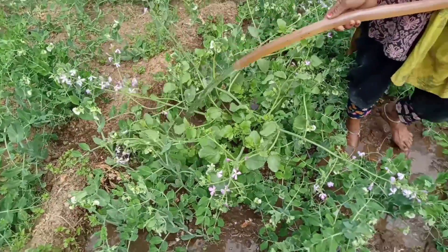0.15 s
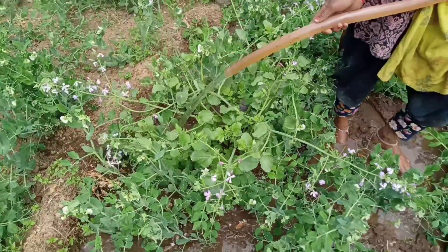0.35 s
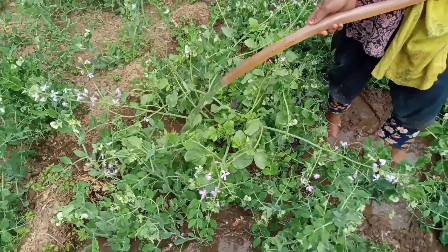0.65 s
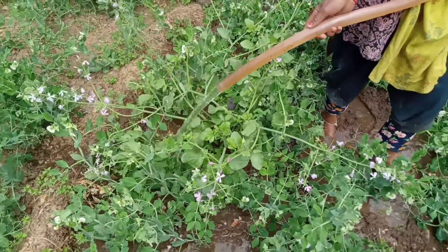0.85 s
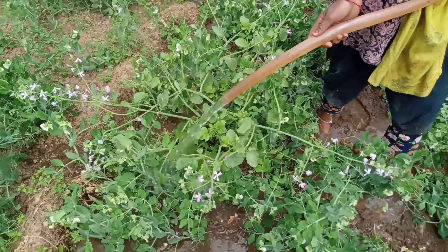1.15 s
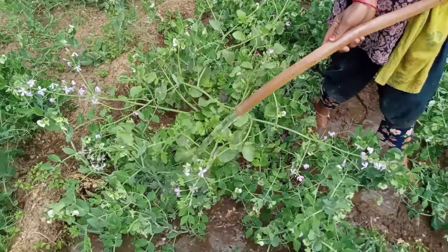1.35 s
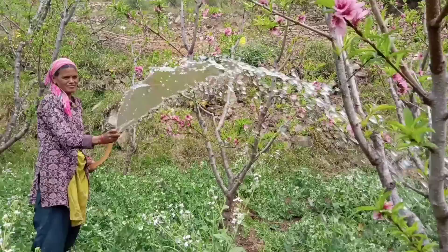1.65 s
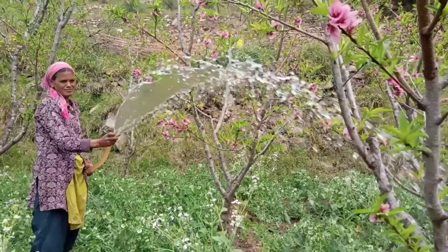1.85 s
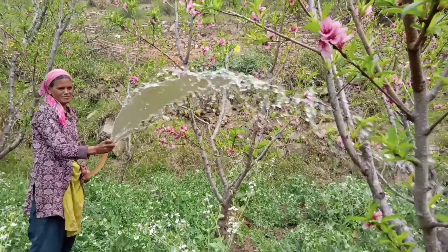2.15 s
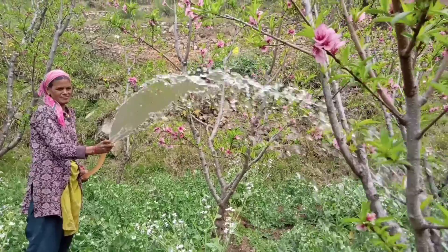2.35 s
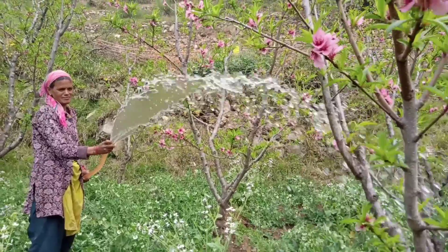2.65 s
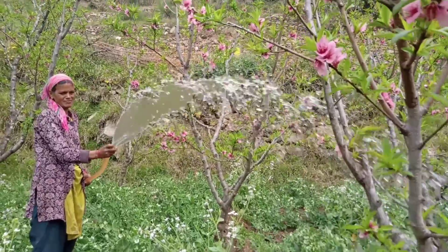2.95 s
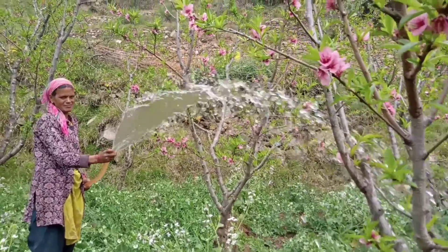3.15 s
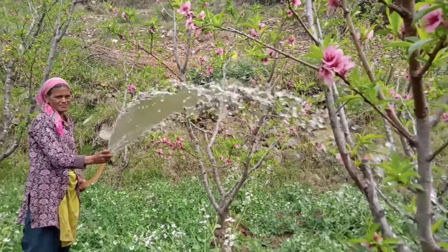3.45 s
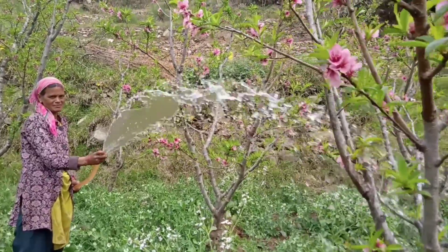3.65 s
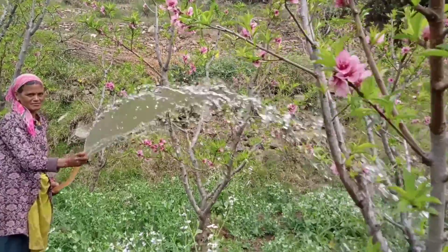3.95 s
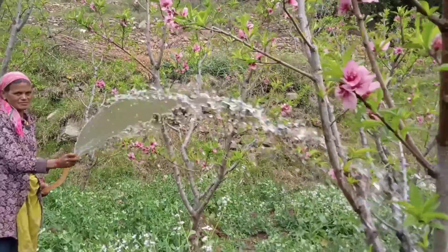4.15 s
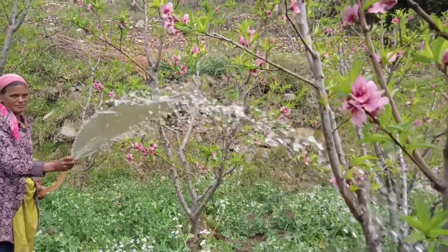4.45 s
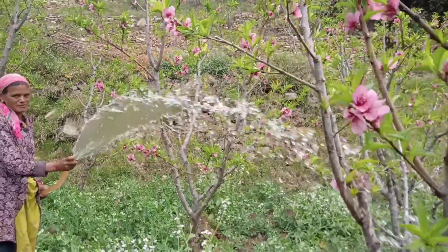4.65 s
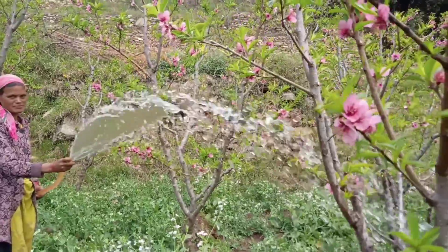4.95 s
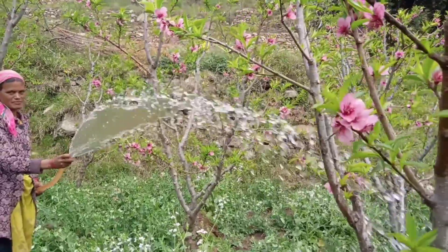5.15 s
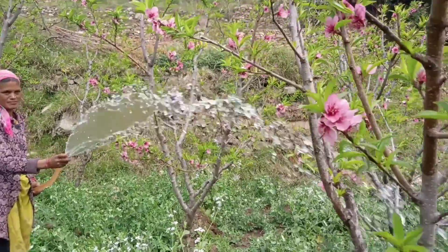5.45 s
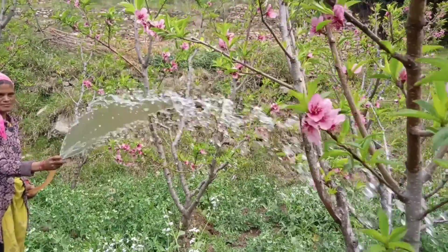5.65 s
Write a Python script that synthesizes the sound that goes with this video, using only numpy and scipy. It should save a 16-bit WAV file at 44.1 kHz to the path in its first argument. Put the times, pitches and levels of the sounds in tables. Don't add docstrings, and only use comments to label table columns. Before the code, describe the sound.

An open field heard through one small microphone, the same on both channels, dry and bright, with very faint low rumble. From 0 to 1.6 s a hose stream pours close by through leaves into mud: a steady fine hiss with wet plops and droplet ticks. Around 0.25-0.45 s it turns toward the puddle and the leafy hiss thins; from about 0.55 s it returns through leaves, with a narrow high singing edge from the hollow it digs. A thin far-off whistle wavers faintly at 0.75-1.15 s. At 1.6 s the sound cuts to silence for a tenth of a second. From 1.7 s a wide fan of water fades in over about 0.2 s, a brighter sizzling spray landing in ragged clumps and brief gaps, with leaf slaps, crisp ticks and bubbling pockets. It grows heavy near 4 s, thins around 4.5 s, and is fullest from 5.15 s to the end at about 5.8 s.

```python
import sys
import numpy as np
from scipy import signal
from scipy.fft import rfft, irfft
from scipy.io import wavfile
from scipy.ndimage import uniform_filter1d, map_coordinates

SR = 44100
rng = np.random.default_rng(int(sys.argv[2]) if len(sys.argv) > 2 else 0)


def dump(signal):
    limited = np.clip(np.atleast_2d(signal).T, -1, 1)
    pcm = np.round(limited * 32767).astype(np.int16)
    wavfile.write(sys.argv[1], SR, pcm)


def volts_from_db(level):
    exponent = np.asarray(level, float) / 20
    return 10 ** exponent


N = 255339
# start in seconds, end in seconds.
CUT = (1.6056, 1.702)
FADE_S, FADE_FROM, FADE_BEND = 0.22, 0.16, 1.25


def unit(x):
    return x / np.sqrt(np.mean(x ** 2) + 1e-20)


def along(points, hz):
    f, db = np.transpose(points[1:])
    return np.interp(np.log(hz + 1), np.log(f + 1), db)


def curves(rows):
    s, *columns = np.transpose(rows)
    return [np.interp(np.arange(N) / SR, s, column) for column in columns]


def wobble(rate):
    knots = rng.standard_normal(int(N * rate / SR) + 4)
    return map_coordinates(knots, [np.arange(N) * rate / SR])


def coloured(x, points, lo, hi):
    hz = np.fft.rfftfreq(8192, 1 / SR)
    edges = 1 / np.sqrt((1 + (lo / (hz + 1)) ** 24) * (1 + (hz / hi) ** 24))
    cepstrum = irfft(np.log(volts_from_db(along(points, hz)) * edges + 1e-6))
    causal = np.r_[cepstrum[0], 2 * cepstrum[1:4096], np.zeros(4096)]
    response = irfft(np.exp(rfft(causal)))[:4096]
    return signal.fftconvolve(x, response)[:N]


def patchy(depth_db):
    z = signal.stft(rng.standard_normal(N), nperseg=256)[2]
    field = uniform_filter1d(rng.standard_normal(z.shape), size=4, axis=0)
    field = uniform_filter1d(field, size=4, axis=1)
    hiss = signal.istft(z * volts_from_db(depth_db * unit(field)), nperseg=256)[1]
    return unit(hiss[:N])


def rings(s, gain, hz, t60, size):
    t = np.arange(size) / SR
    decay = t / t60[:, None]
    turns = hz[:, None] * t
    onset = 1 - np.exp(-1.6 * turns)
    bend = 1 + 0.046 * np.minimum(decay, 1)
    wave = gain[:, None] * volts_from_db(-60 * decay) * onset * np.sin(2 * np.pi * turns * bend)
    at = (s * SR).astype(int)[:, None] + np.arange(size)
    return np.bincount(at.ravel(), wave.ravel(), N + size)[:N]


def drops(count, lo, hi, cycles, size):
    when, pitch, luck = rng.random((count, 3)).T
    hz = lo * (hi / lo) ** pitch
    size_db = -3.5 * np.log(luck + .01)
    return unit(rings(when * N / SR, volts_from_db(size_db), hz, cycles / hz, size))


def bursts(s, db, t60, colour, lo, hi):
    starts = np.bincount(np.round(s * SR).astype(int), volts_from_db(db), N)
    t = np.arange(3000) / SR
    decay = volts_from_db(-60 * t / t60) * (1 - np.exp(-t / 0.000073))
    envelope = signal.fftconvolve(starts, decay)[:N]
    noise = rng.standard_normal(N)
    loss = np.std(coloured(noise, colour, lo, hi))
    return coloured(envelope * noise + 4.3 * starts, colour, lo, hi) / loss


# frequency in Hz, level in dB per Hz.
FIELD = [(18, -44), (30, -24), (43, -6), (118, -0.5), (162, -0.5), (200, -2), (300, 14), (390, -32),
         (660, -120)]


def rumble():
    return unit(coloured(patchy(depth_db=0.5), FIELD, 42.0, 207.4))


# time in seconds, pitch in Hz, level in dB.
WHISTLE = [
    (.73, 1725, -83),
    (.77, 1720, -58),
    (.86, 1735, -64),
    (.93, 1687, -56),
    (.97, 1680, -59),
    (1.01, 1715, -57),
    (1.07, 1690, -58),
    (1.14, 1685, -59),
    (1.17, 1680, -84),
]


def whistle():
    hz, db = curves(WHISTLE)
    phase = 2 * np.pi * np.cumsum(hz + 3 * wobble(40)) / SR
    sounding = db > -79.9
    return sounding * volts_from_db(db + 4.5 + wobble(30)) * np.sin(phase)


# start in seconds, peak in dB, pitch in Hz.
GLUGS = [(1.959, -27.5, 1340), (2.297, -32, 1480), (2.46, -32, 1060), (2.504, -27, 1250),
         (2.619, -36, 1190), (2.763, -26, 1230), (2.854, -32, 800), (3.152, -32, 1480), (3.33, -26, 1300),
         (3.351, -26.5, 1170), (3.466, -30.5, 1240), (3.57, -29, 1110), (3.725, -29, 1090),
         (3.75, -26.5, 1150), (3.971, -25.5, 1490), (4.039, -28, 1100), (4.09, -29, 1200),
         (4.259, -27.5, 1320), (4.434, -30.5, 840), (4.6705, -27, 1210), (4.896, -33, 1340),
         (5.238, -29, 1720), (5.551, -30, 1350), (5.642, -27, 1670), (5.703, -15.5, 1200)]
# start in seconds, peak in dB, pitch in Hz.
SPLOSH = [(0.0716, -19, 3300), (0.089, -33, 1410), (0.092, -21, 3960), (0.194, -17.5, 4080),
          (0.224, -33, 940), (0.257, -31, 490), (0.273, -35, 1120), (0.295, -35, 515), (0.306, -46, 550),
          (0.353, -27, 2270), (0.673, -35, 470), (0.6749, -18, 3970), (0.701, -28, 1440),
          (0.734, -21, 3600), (0.779, -31, 1440), (0.947, -28, 1360), (0.974, -36, 1650),
          (1.157, -27, 3250), (1.2986, -22, 3920), (1.3953, -17.5, 4200), (1.449, -19.5, 3844),
          (1.516, -24.5, 2100)]


def bubbles():
    s, db, hz = np.transpose(list(GLUGS) + list(SPLOSH))
    return rings(s + 0.001063, volts_from_db(db + 1.0), hz, 14 / hz, size=2000)


# frequency in Hz, level in dB per Hz.
FAN_BODY = [(120, -40), (200, -12.5), (348, -13.5), (741, -8.5), (985, -13), (1240, -7.5), (1600, -10),
            (1890, -2), (2480, -5), (2860, 4), (3160, -2), (3750, 1), (4140, -6.5), (4990, -10),
            (6000, -22), (7800, -38.5), (13200, -120)]
# start in seconds, peak in dB, pitch in Hz.
SLAPS = [(2.3181, -31, 3470), (2.3354, -30, 2200), (2.362, -21, 3500), (2.4553, -27, 2680),
         (2.4991, -24, 2630), (2.6219, -24, 1950), (2.691, -25.5, 2700), (2.8536, -25.5, 3260),
         (2.8952, -29.5, 2730), (3.143, -28, 2900), (3.2184, -27, 2800), (3.3217, -26.5, 3440),
         (3.4725, -21.5, 3700), (3.592, -28, 2860), (3.6402, -13, 3780), (3.7263, -25.5, 2920),
         (3.8927, -27, 2070), (3.9737, -28, 2800), (4.0432, -30, 2430), (4.489, -26, 2720),
         (4.5205, -22.5, 3400), (4.778, -22.5, 3050), (4.7885, -22.5, 4200), (4.824, -28, 2050),
         (5.017, -24.5, 3040), (5.235, -26, 2860), (5.5076, -27, 2250), (5.658, -22.5, 2800),
         (5.691, -19, 3250), (5.7623, -20.5, 2350)]


def slaps():
    s, db, hz = np.transpose(SLAPS)
    slap = rings(s + .0006, volts_from_db(db + 6.5), hz, 18 / hz, size=900)
    spatter = bursts(s + 0.00033, db - 7.0, 0.023, FAN_BODY, 740, 6000)
    return slap + spatter


# frequency in Hz, level in dB per Hz.
PORT = [(2350, -41), (4000, -3.5), (5030, -10.5), (5740, -11.5), (6430, -4), (7770, 2.5), (10200, -13.5),
        (11700, -20), (15100, -15), (15700, -11)]
# start in seconds, peak in dB.
STREAM_SPITS = [(0.0707, -35), (0.8285, -22.5), (0.9118, -23), (1.0136, -30), (1.0625, -19.5),
                (1.1089, -21), (1.3823, -21.5), (1.4481, -26), (1.488, -21)]
# start in seconds, peak in dB.
SPITS = [(2.0108, -19), (2.154, -23), (2.194, -22), (2.293, -18), (2.327, -17), (2.363, -10.5),
         (2.393, -23), (2.4977, -23), (2.596, -19), (2.7517, -21), (2.8978, -20), (3.03, -20), (3.139, -21),
         (3.2021, -20), (3.3224, -18.5), (3.4082, -21), (3.6388, -16), (3.6631, -17.5), (3.8945, -20),
         (4.0428, -20), (4.6437, -16.5), (4.7254, -22), (5.0222, -17), (5.0439, -14), (5.2345, -26),
         (5.4046, -16), (5.5077, -13), (5.5832, -18), (5.6565, -21), (5.7131, -16)]


def ticks():
    s, db = np.transpose(list(STREAM_SPITS) + list(SPITS))
    return bursts(s + .0004, db - 6.5, .016, PORT, 4500, 18000)


def stray_ticks(count):
    loudest_db, spread_db = -27, 15
    when, size = rng.random((count, 2)).T
    start = CUT[1] + FADE_S
    s = start + when * (N / SR - start - .01)
    return bursts(s, loudest_db - 6.5 - spread_db * size, .016, PORT, 5200, 18000)


# centre in seconds, swell in dB, half width in seconds.
LUMPS = [(.08, 5.5, .019), (.196, 6, 0.0079), (1.031, 5, .004), (1.407, 4.5, 0.0061), (1.495, 4.8, 0.0113),
         (2.04, 4, 0.0049), (2.195, 4, .009), (2.369, 8.5, 0.0052), (2.462, 8.5, .004), (2.504, 5, 0.0066),
         (2.593, 5, .007), (2.69, 4, .005), (2.767, 3, .01), (3.037, 3.5, 0.019), (3.15, 3, 0.024),
         (3.22, 9.5, 0.0036), (3.472, 5, 0.0068), (3.578, 7.5, 0.0089), (3.646, 8, 0.0056),
         (3.664, 3.5, 0.0091), (3.745, 2.5, 0.016), (3.904, 4.5, 0.0054), (4.274, 6, 0.012),
         (4.484, 5.5, .014), (4.536, 5.5, 0.0065), (4.672, 6, 0.005), (4.825, 3.5, 0.011),
         (5.251, 6.5, 0.0049), (5.324, 2, 0.006), (5.58, 1, .015)]
# centre in seconds, depth in dB, half width in seconds.
GAPS = [(.173, -2, .006), (.213, -3.5, .006), (.691, -6, 0.0033), (.94, -5, 0.014), (2.259, -4, 0.0056),
        (2.311, -10.5, 0.0028), (2.487, -7.5, .007), (2.607, -3, 0.0055), (2.727, -1.5, 0.014),
        (3.076, -2, 0.022), (3.183, -6, 0.0052), (3.301, -3, .007), (3.393, -5.5, 0.0058),
        (3.513, -2.4, 0.022), (3.617, -5.5, 0.013), (3.701, -4.5, 0.014), (3.876, -8, 0.0096),
        (3.955, -9, 0.0038), (4.194, -3, 0.019), (4.298, -6, 0.017), (4.397, -2.5, .012), (4.584, -4, .012),
        (4.703, -10, 0.0057), (4.866, -6, 0.01), (4.98, -6.5, 0.013), (5.289, -4, 0.01), (5.463, -4, 0.015),
        (5.537, -4.5, 0.0075), (5.619, -4, 0.009), (5.781, -3, 0.0065)]


def lumps():
    lopsided = 0.29
    t = np.arange(0, N, 32) / SR
    s, db, width = np.transpose(list(LUMPS) + list(GAPS))[:, :, None]
    width = width * (1 + lopsided * np.sign(db * (t - s)))
    bells = db * np.exp(-.5 * ((t - s) / width) ** 2)
    return np.interp(np.arange(N) / SR, t, np.sum(bells, axis=0))


def clumps(slow_db, fast_db):
    return np.minimum(slow_db, .55) * wobble(24) + fast_db * wobble(170)


# lower edge in Hz, upper edge in Hz.
BANDS = [
    (200, 900),
    (900, 5000),
    (5000, 10000),
    (10000, 18000),
]


def splash(levels, body, port, clump_db, grain):
    gurgle = patchy(depth_db=-1.0) + grain[0] * drops(count=900, lo=192, hi=1006, cycles=7.1, size=900)
    large = patchy(depth_db=2.0) + grain[1] * drops(count=4000, lo=734, hi=4800, cycles=8.0, size=300)
    small = patchy(depth_db=3.5) + grain[2] * drops(count=8000, lo=5060, hi=10700, cycles=5.4, size=80)
    mist = patchy(depth_db=3.0) + grain[3] * drops(count=12000, lo=11700, hi=14800, cycles=5.2, size=40)
    follows = [0.82, 1.13, 0.91, 0.76]
    own_db = [0.24, 1.12, 0.17, 0.6]
    waters, colours = [gurgle, large, small, mist], [body, body, port, port]
    out = np.zeros(N)
    for k, (water, colour) in enumerate(zip(waters, colours)):
        lumpy = water * volts_from_db(follows[k] * clump_db + clumps(own_db[k], own_db[k]))
        out += volts_from_db(levels[k]) * unit(coloured(lumpy, colour, *BANDS[k]))
    return out


# time in seconds, water through the leaves in dB, water into the puddle in dB.
STREAM = [
    (0, 1, 2.5),
    (.16, 0, -3.5),
    (.245, -4.5, 3.5),
    (.27, -8.5, 5),
    (.45, -6.5, -2.5),
    (.54, 1.5, 1.5),
    (.64, 0, -2.5),
    (.93, -2, 2.5),
    (1.02, 1.5, 0.5),
    (1.6, 0.5, -7),
]


def hollow():
    pitch_hz, width = 3890, .05
    level_db, from_s = -52.5, 0.56
    flat = [(0, 0), (1, 0)]
    band = coloured(patchy(depth_db=3.0), flat, pitch_hz * (1 - width), pitch_hz * (1 + width))
    dug = np.clip((np.arange(N) / SR - from_s) / 0.11, 0, 1)
    leaves_db = curves(STREAM)[0]
    return volts_from_db(level_db + leaves_db + 2.5 * wobble(40)) * dug * unit(band)


STREAM_DB = [-54.5, -43, -39.5, -51]
VIA_LEAVES = [.01, .6, .99, 1.2]
VIA_PUDDLE = [.99, .4, -0.13, 0.032]


def stream_levels():
    leaves_db, puddle_db = curves(STREAM)
    shares = zip(STREAM_DB, VIA_LEAVES, VIA_PUDDLE)
    return [db + leaf * leaves_db + puddle * puddle_db for db, leaf, puddle in shares]


# frequency in Hz, level in dB per Hz.
POUR_BODY = [(120, -52), (200, -21.5), (251, -19), (457, -8), (557, -10), (818, -13.5), (930, -10.5),
             (1430, -9.5), (1740, -10), (1900, -13.5), (2310, -2.5), (2790, -11.5), (3810, -3.5),
             (4640, -7.5), (6000, -9), (7800, 0), (13200, -120)]
# frequency in Hz, level in dB per Hz.
POUR_PORT = [(2650, -38), (4500, -8), (5160, -2), (5580, -5), (7530, 3), (8280, -1.5), (9850, -16),
             (11600, -22), (15100, -22), (15800, -23.5)]


def stream(lumps_db):
    clump_db = 0.97 * lumps_db + clumps(slow_db=0.0, fast_db=1.58)
    return splash(stream_levels(), POUR_BODY, POUR_PORT, clump_db, grain=[0.25, 0.23, 0.3, 0.33])


# time in seconds, amount falling in dB.
FAN = [
    (2.0, -1),
    (2.5, 0.4),
    (3.3, -.5),
    (3.95, 1.15),
    (4.5, -1.5),
    (5.15, 1.5),
    (5.79, 1.4),
]
FAN_DB = [-58.5, -44, -37, -45]
SOAKING_DB = [0.88, 0.76, 0.086, 0.47]


def fan_levels():
    amount_db, = curves(FAN)
    since = np.arange(N) / SR - CUT[1]
    return [db + amount_db + creep * since for db, creep in zip(FAN_DB, SOAKING_DB)]


def fan(lumps_db):
    clump_db = 0.99 * lumps_db + clumps(slow_db=-0.5, fast_db=2.0)
    return splash(fan_levels(), FAN_BODY, PORT, clump_db, grain=[0.18, 0.39, 0.54, 0.41])


FIELD_DB = [-65, -60]


def scene():
    t = np.arange(N) / SR
    since = t - CUT[1]
    lumps_db, low = lumps(), rumble()
    first = stream(lumps_db) + volts_from_db(FIELD_DB[0]) * low + whistle()
    fan_fade = np.clip(FADE_FROM + since / FADE_S * (1 - FADE_FROM), 0, 1) ** FADE_BEND
    low_fade = np.clip(0.075 + since / 0.26, 0, 1)
    second = volts_from_db(0.52) * fan(lumps_db) * fan_fade + volts_from_db(FIELD_DB[1]) * low * low_fade
    mono = np.where(t < CUT[0], first, second)
    mono = mono + slaps() + ticks() + bubbles() + stray_ticks(count=45)
    mono = mono + (t < CUT[0]) * hollow()
    before_cut = np.clip((CUT[0] + .0004 - t) / 0.00096, 0, 1)
    mono = mono * (before_cut + (t > CUT[1]))
    return np.array([mono, mono])


def roll_off(x):
    return signal.sosfilt(signal.butter(12, 17090, fs=SR, output="sos"), x)


def record(dry):
    top_hz, slope_hz = 15900, 160
    edge = np.clip((top_hz - np.fft.rfftfreq(N, 1 / SR)) / slope_hz, 0, 1)
    mix = irfft(rfft(dry) * np.sin(edge * np.pi / 2) ** 2, N)
    return roll_off(mix)


dry = scene()
out = record(dry)
dump(out)
```